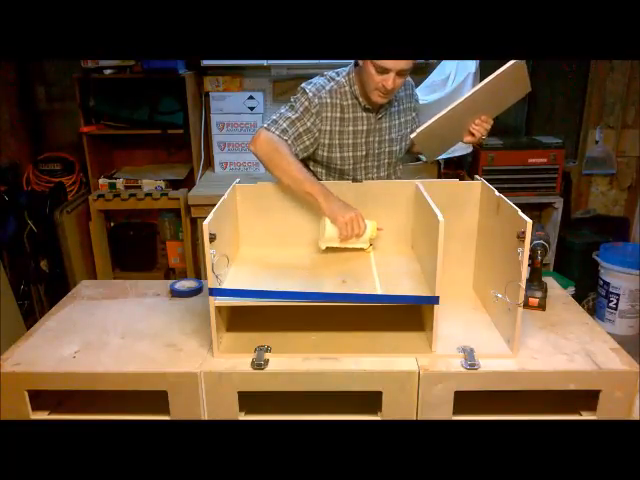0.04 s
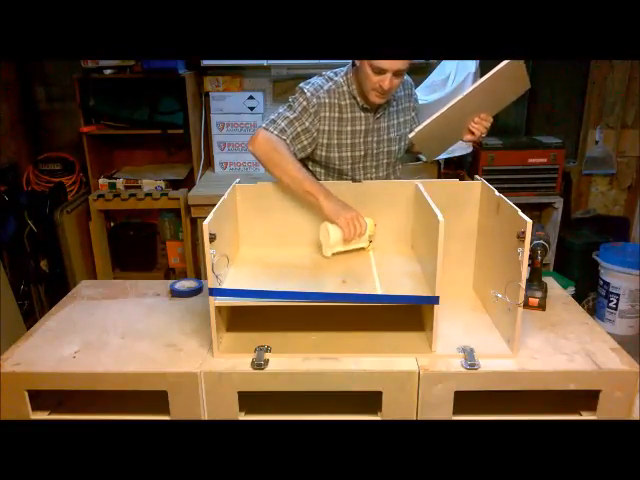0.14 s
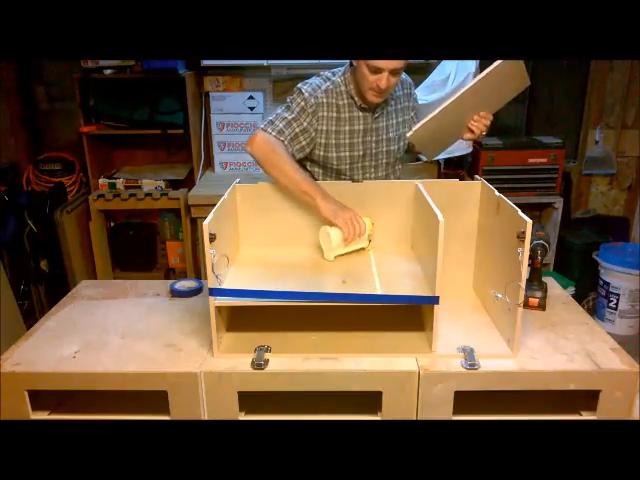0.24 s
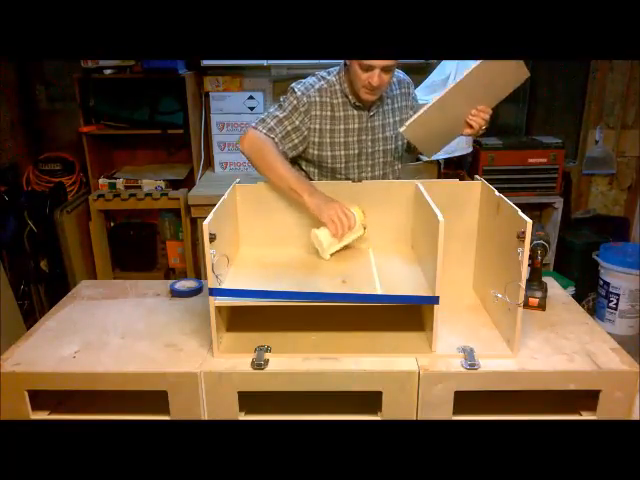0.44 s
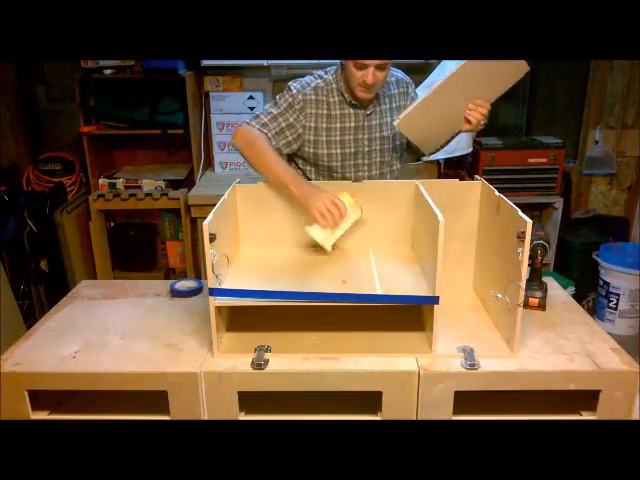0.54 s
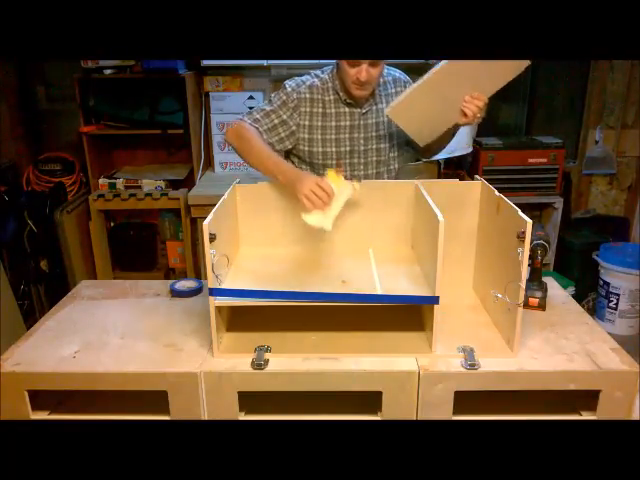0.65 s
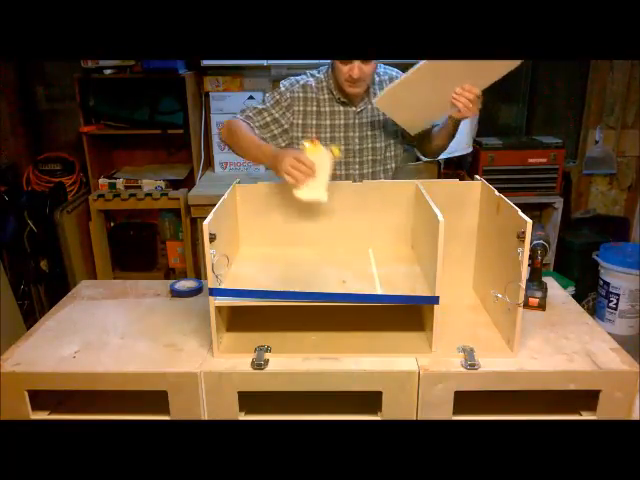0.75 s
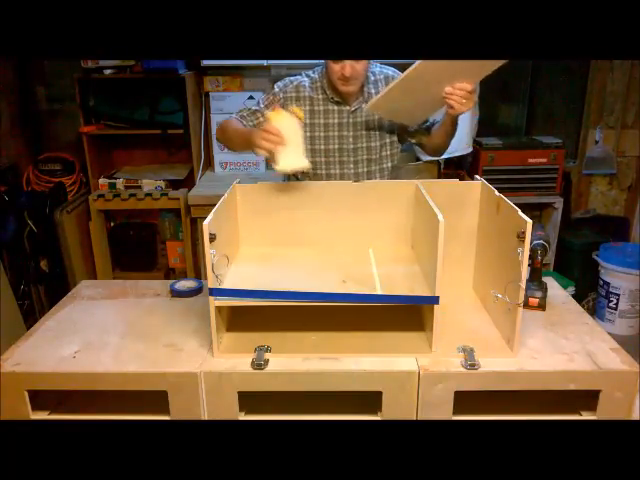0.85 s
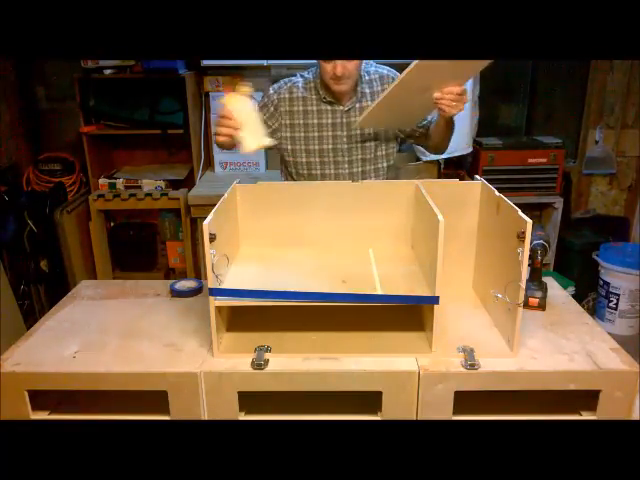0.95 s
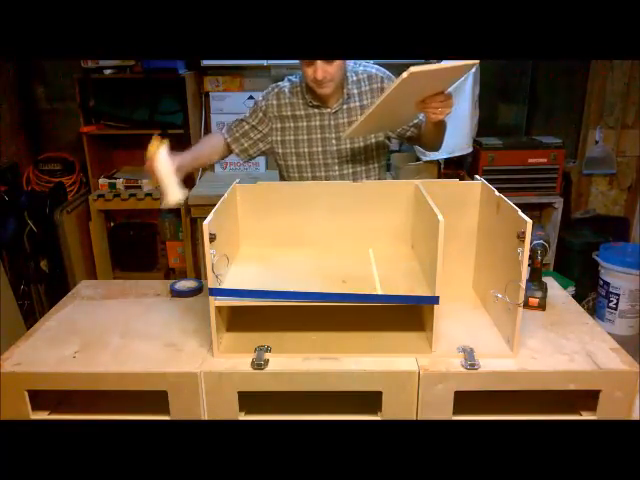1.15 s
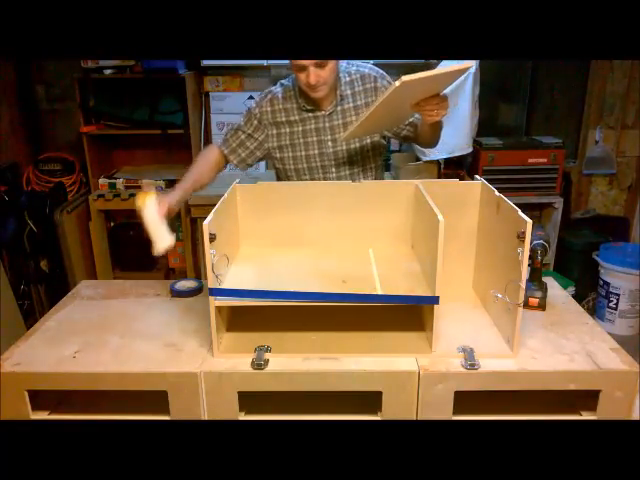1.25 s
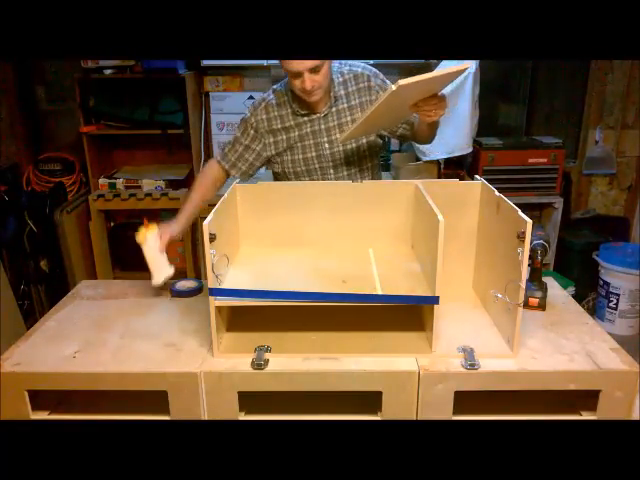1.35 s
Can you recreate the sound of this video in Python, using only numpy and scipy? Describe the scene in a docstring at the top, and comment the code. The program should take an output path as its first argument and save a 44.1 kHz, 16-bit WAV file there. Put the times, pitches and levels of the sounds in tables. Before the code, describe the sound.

In a small workshop, one short boxy knock of plastic on plywood rings and dies quickly, followed by barely audible panel taps, over steady high cricket chirps, soft rumble and microphone hiss.

```python
"""A plastic glue bottle bumps against a plywood cabinet on a workbench: coloured noise slides and clacks, and
damped sines ring the hollow cabinet. Later a hand shifts on a loose panel with faint taps of noise and sines.
Decaying noise gives the small workshop's brief answer. Outside, crickets chirp in pulsed narrow-band noise
over a distant chorus; shaped noise makes the low room rumble and microphone hiss."""
import sys
import numpy as np
from scipy import signal
from scipy.fft import rfft, irfft, next_fast_len
from scipy.io import wavfile

SR = 44100
rng = np.random.default_rng(int(sys.argv[2]) if len(sys.argv) > 2 else 0)


def dump(signal):
    """Clip the signal to [-1, 1] and save it as 16-bit WAV at the path in sys.argv[1]."""
    limited = np.clip(np.atleast_2d(signal).T, -1, 1)
    pcm = np.round(limited * 32767).astype(np.int16)
    wavfile.write(sys.argv[1], SR, pcm)


N = 61739  # length in samples
CONTACT_ATTACK_S = 0.0021  # rise time constant of bottle clacks and panel brushes


def amp(db):
    """Decibels to gain."""
    return 10 ** (np.asarray(db) / 20)


def unit(x):
    """Scale to rms 1."""
    return x / np.sqrt(np.mean(x ** 2) + 1e-20)


def along(points, hz):
    """Read a curve of (Hz, value) points on a log frequency axis."""
    point_hz, values = np.transpose(points)
    return np.interp(np.log(hz + 1), np.log(point_hz + 1), values)


def filtered(x, response):
    """Multiply the spectrum of x by a response of frequency."""
    size = next_fast_len(N + SR // 2)  # zero padding leaves room for the filter to ring out
    hz = np.fft.rfftfreq(size, 1 / SR)
    return irfft(rfft(x, size) * response(hz), size)[:N]


def noise(colour):
    """Noise of rms 1 with a (Hz, dB) colour."""
    return unit(filtered(rng.standard_normal(N), lambda hz: amp(along(colour, hz))))


def since(s):
    """Seconds since a moment, zero before it."""
    return np.maximum(np.arange(N) / SR - s, 0)


def hump(s, length):
    """Half a sine: a smooth swell and fall, silent outside its length in seconds."""
    return np.sin(np.pi * np.minimum(since(s) / length, 1))


def strike(s, attack, t60):
    """Envelope of a blow: quick rise, exponential fall."""
    t = since(s)
    return (1 - np.exp(-t / attack)) * amp(-60 * t / t60)


def ring(s, modes):
    """Damped modes, rows of (Hz, dB, t60 in seconds), set going at one moment."""
    out = np.zeros(N)
    for hz, db, t60 in modes:
        out += amp(db) * strike(s, 0.0016, t60) * np.sin(2 * np.pi * hz * since(s))
    return out


def cricket(first, period, hz, width, db):
    """Regular chirps of a few wing strokes: a narrow tone, drawn out by echoes that carry a wider rasp."""
    # The wing strokes of one chirp: mean relative level of each [dB].
    stroke_levels = [-1, 1.5, -3.5]
    stroke_gap_s, stroke_s = 0.0211, 0.023
    echo_t60_s, echo_db = 0.24, 1.5
    skirt = 0.66  # how steeply the tone falls away from its pitch
    rasp_above_hz, rasp_width_hz, rasp_db = 90, 330, -2

    # Strokes and echoes add as power, since the noise they shape is random.
    stroke_power, echo_power = np.zeros(N), np.zeros(N)
    for chirp in range(-2, 14):  # earlier chirps leave echoes at the start
        for j, stroke_db in enumerate(stroke_levels):
            s = first + chirp * period + j * stroke_gap_s
            size = amp(stroke_db + rng.normal(0, 1))  # strokes vary by about 1 dB
            stroke_power += (size * hump(s, stroke_s)) ** 2 / 2
            echo_power += (size * amp(echo_db) * strike(s, stroke_s / 2, echo_t60_s)) ** 2

    def tone_band(f):
        return (1 + ((f - hz) / width) ** 2) ** -skirt

    def rasp_band(f):
        return 1 / (1 + ((f - hz - rasp_above_hz) / rasp_width_hz) ** 2)

    tone = unit(filtered(rng.standard_normal(N), tone_band))
    rasp = unit(filtered(rng.standard_normal(N), rasp_band))
    chirps = np.sqrt(stroke_power + echo_power) * tone
    return amp(db) * (chirps + amp(rasp_db) * np.sqrt(echo_power) * rasp)


def crickets():
    """Single crickets chirp in front of a distant chorus that blurs into a steady band of noise."""
    # Each row: first chirp in seconds, chirp period in seconds, pitch in Hz, width in Hz, level in dB.
    singers = [(0.0705, .1452, 5864, 69, -65.5), (.0, .111, 6620, 150, -76)]
    # Colour of the distant crickets. Each row: frequency in Hz, relative level in dB.
    chorus_colour = [(4500, -28), (5300, -14), (5700, -4.5), (6300, 3), (6650, 2.5), (7000, -0.5),
                     (7300, -8), (7700, -33), (9000, -47)]
    return sum(cricket(*row) for row in singers) + amp(-71) * noise(chorus_colour)


def room_floor():
    """Low room rumble and microphone hiss as one steady shaped noise."""
    # Colour of the rumble and hiss. Each row: frequency in Hz, relative level in dB.
    floor_colour = [(20, -4), (35, -0.5), (58, 2), (85, 0.5), (120, -3), (170, -11), (300, -14.5),
                    (700, -16.5), (1300, -20.5), (2200, -26), (4500, -26), (8000, -33.5), (11000, -31.5),
                    (15000, -31.5)]
    return amp(-64.5) * noise(floor_colour)


def slide():
    """The bottle slides softly over the plywood before it catches: friction noise that swells and fades."""
    # Colour of the friction. Each row: frequency in Hz, relative level in dB.
    slide_colour = [(120, -13), (230, -7), (280, 6.5), (360, -15), (450, -16), (600, -6), (800, -20),
                    (1500, -19), (4000, -26.5), (9000, -47)]
    start_s, end_s = 0.14, 0.28
    stroke = hump(start_s, end_s - start_s)
    return amp(-64.5) * np.sqrt(np.abs(stroke)) * noise(slide_colour)


def clack(s, db):
    """The brief noise of plastic meeting plywood, brighter the harder it hits."""
    # Colour of a contact before its treble is dulled. Each row: frequency in Hz, relative level in dB.
    clack_colour = [(30, -34), (85, -6), (140, -24), (200, -5), (300, -9), (500, -4), (750, -1), (1000, 1),
                    (1200, -.5), (1500, -1.5), (1900, -8), (2500, -12), (3200, -17), (4000, -21),
                    (6000, -25), (12000, -44)]
    # A lighter contact is duller: its treble corner falls with its level.
    firm_db, firm_corner_hz, db_per_octave = -26, 7440, 9.5
    corner = firm_corner_hz * 2 ** ((db - firm_db) / db_per_octave)
    grit = filtered(noise(clack_colour), lambda hz: 1 / (1 + (hz / corner) ** 2))
    return amp(db) * strike(s, CONTACT_ATTACK_S, 0.014) * grit


def shop(x):
    """The workshop's reverberation: a noise tail, each frequency dying at its own speed."""
    # Decay of the room. Each row: frequency in Hz, t60 in seconds.
    room_decay = [(100, .25), (300, .28), (1000, .35), (3000, .31), (10000, .2)]
    wall_delay_s, wall_build_s = 0.0077, 0.0017  # silence before the walls answer, then time constant
    hz, t, z = signal.stft(rng.standard_normal(SR // 2), SR, nperseg=256)
    decay = amp(-60 * t / along(room_decay, hz)[:, None])
    tail = signal.istft(z * decay, SR, nperseg=256)[1]
    tail = tail * (1 - np.exp(-since(wall_delay_s)[:len(tail)] / wall_build_s))
    return signal.fftconvolve(x, tail / np.linalg.norm(tail))[:N]


def knocks():
    """Bottle on cabinet: each contact clacks into the room and rings the hollow cabinet and the bottle."""
    # The contacts. Each row: start in seconds, level of the ring in dB, level of the clack in dB.
    contacts = [(0.2226, -53.5, -53), (0.2286, -55, -54), (.2480, -38, -34.5), (.2561, -33, -33),
                (0.273, -36, -35.5), (0.2945, -42.5, -55), (0.3187, -45, -55), (0.3393, -47.5, -62),
                (0.3525, -47, -62), (.3912, -56, -69)]
    # The modes a contact sets ringing: the cabinet's, with the bottle's own in the last two rows. Each row:
    # frequency in Hz, relative level in dB, t60 in seconds.
    knock_modes = [(59.3, -10, .29), (85, -11.5, 0.142), (186.6, -16.5, 0.44), (232.25, -10.5, 0.34),
                   (255, 3.5, .13), (279.5, -4.5, 0.32), (298.9, 3.8, .23), (344, -18.5, .35),
                   (395, -17, 0.33), (508.6, -12, 0.26), (568.3, 6, 0.038), (626, -7.2, 0.12),
                   (659.4, -9.5, 0.23), (683, -8.5, 0.28), (825.7, -13, 0.12), (1007.6, -16, 0.13),
                   (1376, -21, .15)]
    out = np.zeros(N)
    for s, ring_db, clack_db in contacts:
        direct = clack(s, clack_db)
        out += amp(ring_db) * ring(s, knock_modes)
        out += direct + amp(3) * shop(direct)  # reverberation 3 dB up
    return out


def panel():
    """Soft taps on the hand-held plywood: a brush of noise, a light ring of modes and a low thud."""
    # The taps. Each row: start in seconds, level of brush and ring in dB, level of the thud in dB.
    taps = [(.636, -75.5, -54.5), (.775, -63, -60), (.791, -63.5, -71), (.83, -72.5, -72)]
    # The panel's modes. Each row: frequency in Hz, relative level in dB, t60 in seconds.
    panel_modes = [(449.4, -5.5, 0.17), (851.7, -1, 0.22), (913, -5, 0.19), (1907, -14, 0.5),
                   (2560, -17.5, 0.18)]
    # Colour of the brush. Each row: frequency in Hz, relative level in dB.
    brush_colour = [(200, -8), (850, 2), (1400, -7.5), (4000, -8.5), (9000, -22)]
    brush_db, brush_wet_db, brush_t60_s = -4, 4, 0.086
    thud_hz, thud_t60_s = 342, 0.042
    out = np.zeros(N)
    for s, db, thud_db in taps:
        brush = amp(brush_db) * strike(s, CONTACT_ATTACK_S, brush_t60_s) * noise(brush_colour)
        tap = ring(s, panel_modes) + brush + amp(brush_wet_db) * shop(brush)
        thud = ring(s, [(thud_hz, thud_db, thud_t60_s)])
        out += amp(db) * tap + thud
    return out


def scene():
    """The bench sounds over the crickets and the quiet of the room."""
    background = crickets() + room_floor()
    bench = slide() + knocks() + panel()
    return (background + bench)[None]


def record(dry):
    """The camera keeps nothing above its band limit."""
    top_hz = 15700
    return filtered(dry[0], lambda hz: hz < top_hz)[None]


dry = scene()
out = record(dry)
dump(out)
```